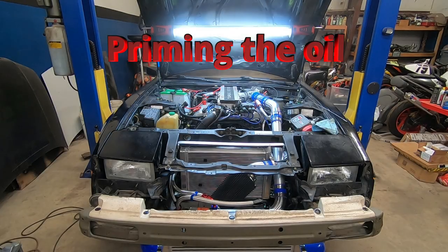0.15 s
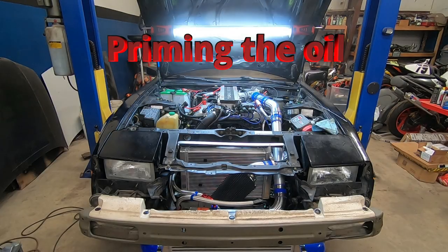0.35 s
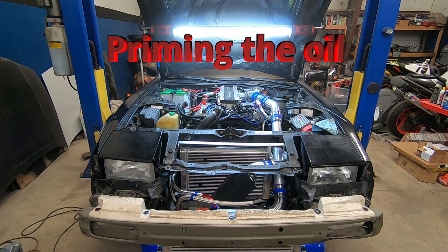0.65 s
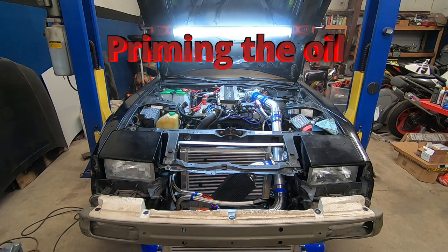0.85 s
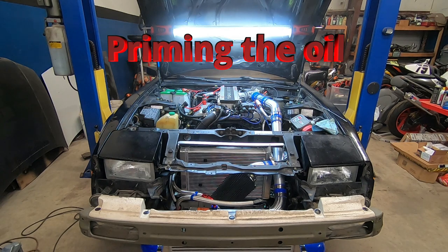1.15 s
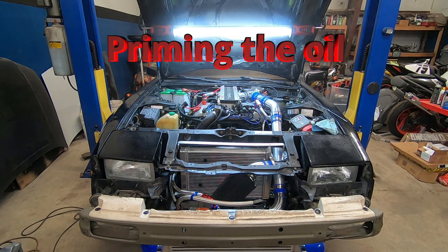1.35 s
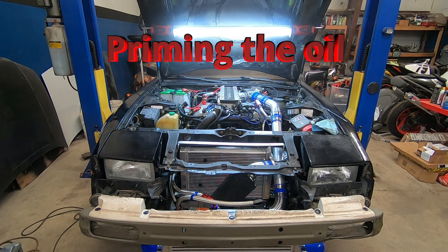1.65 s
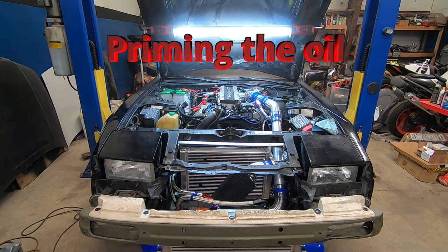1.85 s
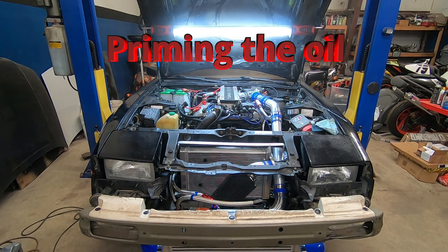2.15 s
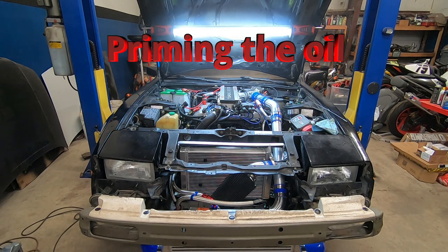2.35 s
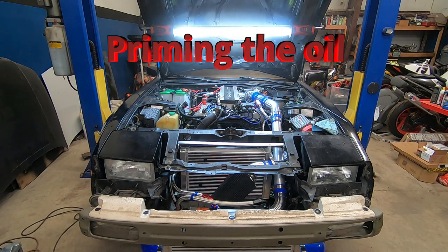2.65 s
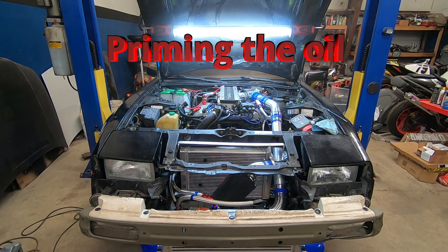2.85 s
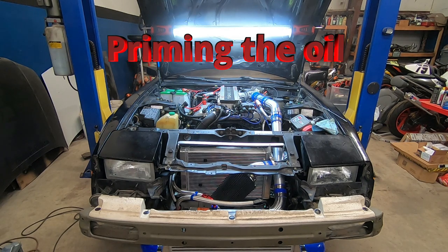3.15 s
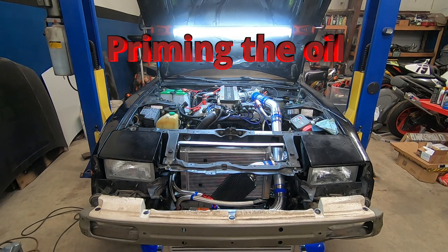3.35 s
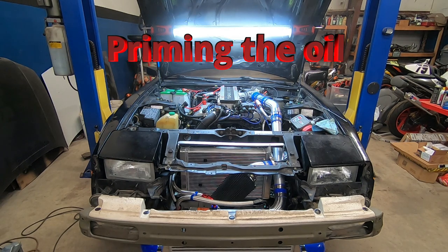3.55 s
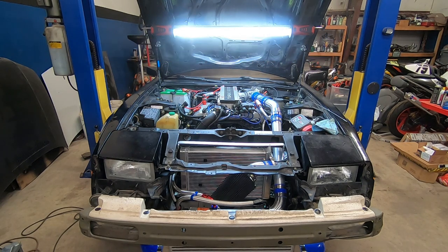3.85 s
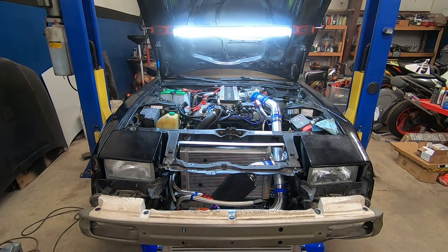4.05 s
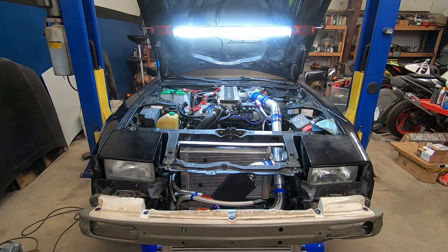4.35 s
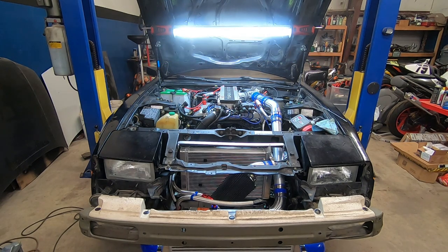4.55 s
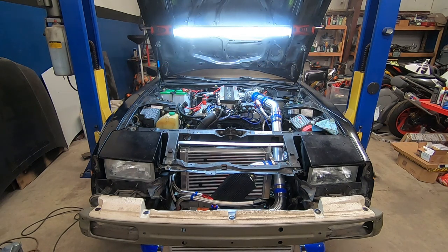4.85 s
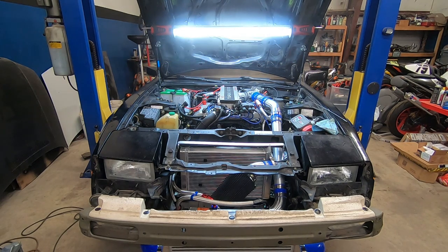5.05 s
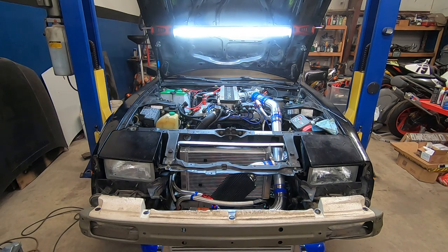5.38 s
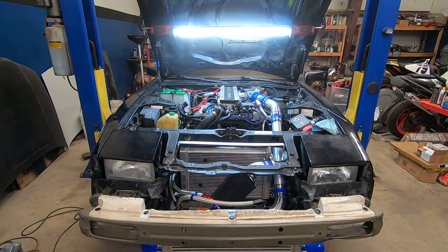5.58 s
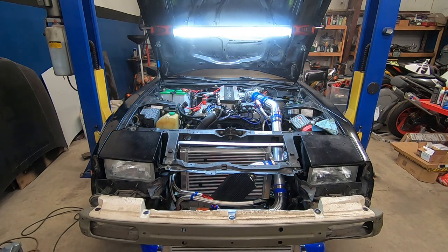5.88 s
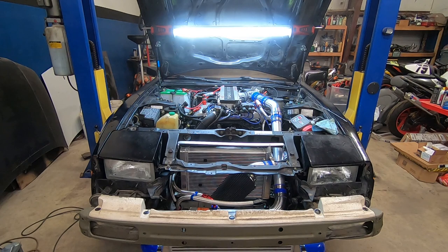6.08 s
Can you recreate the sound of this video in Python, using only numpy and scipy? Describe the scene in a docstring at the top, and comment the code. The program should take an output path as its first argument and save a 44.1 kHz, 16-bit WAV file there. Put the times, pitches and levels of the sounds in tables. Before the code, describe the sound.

Close in front of a car inside a hard-walled workshop, the starter cranks rapidly and evenly, its gears knocking, rebounding and grinding over soft low thumps. The engine never fires. A steel clank ends the effort, and the freed motor spins down with uneven rattles and low groans. Quiet room hum and a faint pump hiss remain until a tiny squeak; then a clunk, short squeals and laboured cranking cut off at the end.

```python
"""Starter cranking an engine in a garage

A car engine is turned on its starter twice without firing: impacts and rough contact excite resonant metal.
The starter grinds; each piston stroke shakes the gears into a group of knocks and thumps the air.
On release the pinion clanks free and the motor coasts; a pump hisses on and stops with a small squeak.
Steady hum, wavering drones and air noise fill the shop throughout."""
import sys
import numpy as np
from scipy import signal
from scipy.fft import rfft, irfft, next_fast_len
from scipy.io import wavfile
from scipy.ndimage import uniform_filter1d

SR = 44100
rng = np.random.default_rng(int(sys.argv[2]) if len(sys.argv) > 2 else 0)


def materialize(psi):
    """Save the field psi as 16-bit PCM at rate SR to the path in sys.argv[1].

    A 1-D psi becomes a single channel; in a 2-D psi each row is a channel.
    """
    bounded = np.clip(np.atleast_2d(psi).T, -1, 1)
    quanta = np.round(bounded * 32767).astype(np.int16)
    wavfile.write(sys.argv[1], SR, quanta)


N = 274302
SIZE = next_fast_len(N + SR)  # padded length for filtering
HZ, T = np.fft.rfftfreq(SIZE, 1 / SR), np.arange(N) / SR

# Levels are relative dB; each spectrum is scaled to unit power before use.
# Piston strokes, each a gear knock, its rebound and a settling. Each row: start in seconds, knock in dB,
# rebound delay in seconds, rebound in dB, settling delay in seconds, settling in dB.
STROKES = [(0.003, -16.5, 0.028, -23, 0.041, -36), (0.078, -20, 0.024, -20, 0.049, -23),
           (0.187, -18, 0.021, -23.5, 0.039, -24), (0.285, -19, 0.021, -18.5, 0.048, -20),
           (0.394, -22, 0.022, -18, 0.072, -36), (0.496, -17.5, 0.025, -19.5, 0.053, -20.5),
           (0.607, -17.5, 0.022, -19, 0.058, -27), (0.713, -19, 0.021, -17.5, 0.041, -25.5),
           (0.821, -17.5, 0.022, -19, 0.054, -38), (0.922, -18, 0.026, -17, 0.041, -28),
           (1.031, -21, 0.02, -19.5, 0.05, -26.5), (1.137, -17, 0.027, -19, 0.069, -30.5),
           (1.244, -17.5, 0.018, -18.5, 0.045, -21.5), (1.351, -19, 0.025, -18, 0.061, -26.5),
           (1.459, -20, 0.02, -21, 0.041, -21), (1.566, -16.5, 0.016, -21.5, 0.045, -23),
           (1.671, -19, 0.024, -18.5, 0.037, -29), (1.776, -19, 0.021, -16, 0.042, -27.5),
           (1.882, -17.5, 0.025, -17, 0.042, -25.5), (1.99, -18.5, 0.021, -19.5, 0.048, -21.5),
           (2.097, -19.5, 0.02, -20, 0.046, -25), (2.202, -17.5, 0.026, -18.5, 0.051, -26.5),
           (2.312, -18, 0.011, -23, 0.035, -33), (2.413, -21.5, 0.019, -20, 0.046, -21),
           (2.522, -18, 0.028, -19, 0.063, -29), (2.629, -18, 0.024, -20, 0.049, -22.5),
           (2.74, -17, 0.028, -22, 0.041, -34.5), (2.84, -19.5, 0.025, -20, 0.065, -21.5),
           (2.952, -21.5, 0.02, -18.5, 0.049, -24.5), (3.057, -19, 0.026, -19.5, 0.059, -25),
           (5.897, -20, 0.033, -26, 0.064, -23.5), (6.054, -21, 0.022, -21, 0.045, -25.5),
           (6.119, -23, 0.011, -29.5, 0.049, -28), (6.209, -20.5, 0.026, -20, 0.05, -25)]
# Bell housing and block modes. Each row: frequency in Hz, width in Hz, base gain over the broad sound in dB.
HOUSING = [(643, 25, 4), (743, 26, 7), (850, 35, 1), (1203, 18, 12.5), (1364, 40, 2), (1415, 16, 5),
           (1473, 20, 10.5), (1615, 20, 11), (1684, 14, 4), (1831, 30, 2), (2045, 20, 2), (2630, 24, 3),
           (2809, 22, 3), (3200, 120, 1), (3480, 150, 1)]
# Motor frame modes. Each row: frequency in Hz, width in Hz, gain over the broad sound in dB.
FRAME = [(4500, 180, 9), (5210, 160, 5), (6970, 1180, 4.5), (6360, 60, 8), (6430, 60, 5.5),
         (8490, 28, 10.5)]
# Starter under load, one table a try. Each row: time in seconds, base grind level in dB, rumble level in dB.
LOAD = [
    [(0.0, -23, -38.5), (3.14, -23.5, -39), (3.2, -26, -42.5), (3.26, -46.5, -56.5)],
    [(5.85, -30.5, -39), (5.862, -26.5, -36.5), (5.97, -22, -36), (6.04, -21.5, -43.5), (6.15, -23, -47),
     (6.22, -20.5, -35)],
]
# Spectrum of steel blows. Each row: frequency in Hz, density in dB per Hz.
STEEL = [(120, -41.5), (200, -7), (1030, -6.5), (1190, 4.5), (1840, -4), (2900, 1.5), (5900, -12),
         (6570, -10), (10000, -20.5), (12000, -41.5), (14200, -37), (15500, -54)]
ENGAGE_S, SPIN_UP_S = 5.86, .35  # second try: the motor starts to turn, time to reach speed
CLATTER_S = .008  # duration of the short clatter in a knock


def amp(db):
    """Decibels express amplitude ratios logarithmically."""
    return 10 ** (np.asarray(db) / 20)


def evened(x):
    """Normalisation to unit mean power."""
    return x / np.sqrt(np.mean(x ** 2) + 1e-20)


def read(points, hz):
    """Interpolation on a logarithmic frequency axis."""
    f, value = np.transpose(points)
    return np.interp(np.log(hz + 1), np.log(f + 1), value)


def level(rows, column=1):
    """Amplitude envelope: gain along a dB curve, silent outside it."""
    rows = np.array(rows)
    return amp(np.interp(T, rows[:, 0], rows[:, column], -200, -200))


def bursts(times, dbs, t60s, rise_s=0.0013, hold_s=0.):
    """Exponential decay: blows rise fast, hold and die away, cut after half a second; powers add."""
    power, t = np.zeros(N), np.arange(SR // 2) / SR
    for s, db, t60 in zip(times, dbs, t60s * np.ones(len(times))):
        decay_db = 60 * np.maximum(t - hold_s, 0) / max(t60, .01)
        blow = amp(db - decay_db) ** 2 * (1 - np.exp(-t / rise_s))
        part = power[round(s * SR):][:len(t)]
        part += blow[:len(part)]
    return np.sqrt(power)


def uneven(db, span_s):
    """Random amplitude modulation: smoothed noise makes the gain wander by an rms depth in dB."""
    wander = uniform_filter1d(rng.standard_normal(N), round(span_s * SR))
    return amp(db * evened(wander))


def colour(points, modes=()):
    """Modal response of unit power: a broad spectrum with resonances on top."""
    ring = 1 + sum(amp(db) / (1 + 2j * (HZ - hz) / width) for hz, width, db in modes)
    response = amp(read(points, HZ)) * ring
    return response / np.sqrt(np.mean(abs(response) ** 2))


def shaken(envelope, response, grain_db=0.):
    """Random excitation: dense taps under an envelope sound a body; one draw frontal, one sideways."""
    grain = amp(grain_db * rng.standard_normal(N // 32 + 1)).repeat(32)[:N]
    taps = rng.standard_normal((2, N)) * grain
    return irfft(rfft(evened(taps) * envelope, SIZE) * response, SIZE)[:, :N]


def tone(hz):
    """Phase accumulation: a unit-power sine with a random starting phase in each channel."""
    turns = np.cumsum(hz * np.ones(N)) / SR
    return np.sqrt(2) * np.sin(2 * np.pi * (turns + rng.random((2, 1))))


def getting_up_to_speed(t):
    """Linear spin-up: a share falling from one to zero as the motor gathers speed on the second try."""
    return (t > ENGAGE_S) * np.clip(1 - (t - ENGAGE_S) / SPIN_UP_S, 0, 1)


def knock_rows():
    """Repeated impact: strokes knock, rebound and settle; tone and cover rattle vary from knock to knock."""
    bright_db, bright_spread_db = -2, 2.5  # upper ring against lower
    cover_offset_db, cover_spread_db = -7, 3.5  # cover rattle against the knock
    slow_dull_db = -8  # knocks are dull until the motor is up to speed
    s, db, gap, rebound_db, settle_gap, settle_db = np.transpose(STROKES)
    luck = rng.standard_normal((len(s), 6)).T
    times = np.array([s, s + gap, s + settle_gap]).ravel()
    dbs = np.array([db, rebound_db, settle_db]).ravel()
    dull_db = slow_dull_db * getting_up_to_speed(times)
    upper_db = bright_db + bright_spread_db * luck[:3].ravel() + dull_db
    cover_db = dbs + cover_offset_db + cover_spread_db * luck[3:].ravel() + dull_db
    heard = times < N / SR
    return times[heard], dbs[heard], upper_db[heard], cover_db[heard]


def housing_ring(s, db):
    """Impulse response of modes: single blows inside each clatter ring the housing in varying mixes."""
    ring_db, rise_db_per_s = 20, 1.2  # gain of the clear ring, its growth through a try
    mode_spread_db = 3  # each blow favours other modes
    delay_s = 0.004003 + CLATTER_S * rng.random((len(s), 2)).T
    at = np.minimum(np.round((s + delay_s) * SR).astype(int), N - 1)
    out = np.zeros((2, N))
    for hz, width, mode_db in HOUSING:
        blows, keep = np.zeros((2, N)), np.exp(-np.pi * width / SR)
        luck_db = mode_spread_db * rng.standard_normal((len(s), 2)).T
        blow_db = db + rise_db_per_s * (s % ENGAGE_S) + 2 * mode_db + luck_db
        np.put_along_axis(blows, at, amp(blow_db), 1)
        pole = keep * np.exp(2j * np.pi * hz / SR)
        out += 2 * signal.lfilter([1 - keep], [1, -pole], blows).real
    blunt = 1 / (1 + 1j * HZ / 3500) ** 4  # steel on steel stays in touch a moment, which dulls the top
    return amp(ring_db) * irfft(rfft(out, SIZE) * blunt, SIZE)[:, :N]


def gear_knocks():
    """Impact excitation: slack gears strike the housing, some low, some high, and rattle a sheet cover."""
    # Each row: frequency in Hz, density in dB per Hz.
    knock_spectrum = [(400, -15.5), (502, -28), (738, -2.5), (1100, -1.5), (1200, -4.5), (1280, -1),
                      (1640, -0.5), (1910, -4.5), (3100, 0), (4010, -16.5), (5400, -14.5), (7190, -20),
                      (12000, -57.5), (15600, -74.5)]
    # Sheet cover modes. Each row: frequency in Hz, width in Hz, gain in dB before a common 30 dB boost.
    cover_modes = [(4414, 120, 0.5), (4974, 74, 10), (4790, 48, 9), (4820, 520, -5)]
    s, db, upper_db, cover_db = knock_rows()
    body, split = colour(knock_spectrum, HOUSING), 1 / (1 + (HZ / 2200) ** 6)
    low = bursts(s, db - upper_db / 2 - 1.5, 0.055, rise_s=0.005, hold_s=CLATTER_S)
    high = bursts(s, db + upper_db / 2, 0.045, rise_s=0.005, hold_s=CLATTER_S)
    knocks = shaken(low, body * np.sqrt(split), grain_db=1.5)
    knocks += shaken(high, body * np.sqrt(1 - split))
    boosted = [(hz, width, d + 30) for hz, width, d in cover_modes]
    cover = colour([(2000, -27.0), (4000, 4.5), (5500, 0), (9000, -45.0)], boosted)
    knocks += shaken(bursts(s, cover_db, 0.0555, rise_s=0.0069), cover, grain_db=1.5)
    return knocks + housing_ring(s, db), low + high


def grinding(knock_envelope):
    """Rough contact under load: teeth press harder after each knock and ease off before the next stroke."""
    # Each row: frequency in Hz, density in dB per Hz.
    grind_spectrum = [(280, -40), (400, -12.5), (511, -23.5), (737, -10.5), (927, 1.5), (1200, -2),
                      (1280, 3), (1630, 0), (1930, 3), (3250, -2.5), (4030, -9), (4410, -13.5), (7090, -19),
                      (10100, -25), (12500, -43.5), (15500, -42.5)]
    # Treble whirr, one table a try. Each row: time in seconds, level in dB before a common 1 dB cut.
    whirr_levels = [
        [(0.0, -37.5), (3.07, -38), (3.2, -33.5)],
        [(5.87, -51), (5.898, -38.5), (6.22, -38.5)],
    ]
    labour = 0.11  # steady strain, strongest as the motor starts to turn on the second try
    keep = np.exp(-1 / (0.036 * SR))
    strain = signal.lfilter([1 - keep], [1, -keep], knock_envelope)
    strain = strain + labour * getting_up_to_speed(T)
    load = sum(level(rows) for rows in LOAD)
    teeth = colour(grind_spectrum, FRAME + [(hz, width, d - 5) for hz, width, d in HOUSING])
    # power splits at 2600 and 5500 Hz; the strain acts mostly below the treble
    upper = 1 / (1 + (2600 / (HZ + 1)) ** 4)
    top = 1 / (1 + (5500 / (HZ + 1)) ** 12)
    grind = shaken((.3 + 5.5 * strain) * load, teeth * np.sqrt(1 - upper), grain_db=2.5)
    grind += shaken((0.59 + 1.1 * strain) * load, teeth * np.sqrt(upper * (1 - top)), grain_db=1.5)
    whirr = evened(abs(teeth) * np.sqrt(top))
    whirr_gain = sum(level(rows) for rows in whirr_levels) * amp(-1.0) * uneven(1.4, 0.032)
    return grind + shaken(whirr_gain, whirr, grain_db=1.5)


def slack_rattle():
    """Backlash: late in each stroke the slack gears rattle brightly against the motor frame."""
    slack_s, slack_db, spread_db = .078, -39, 6  # mean delay after the stroke, mean level, its spread
    strokes = np.array(STROKES)[:-1, 0]
    late, size = rng.standard_normal((len(strokes), 2)).T
    times = strokes + slack_s + 0.0056 * late
    slack = bursts(times, slack_db + spread_db * size, 0.066, rise_s=0.0037, hold_s=0.014)
    bright = colour([(3000, -29.5), (4400, 5.5), (7000, 0.5), (10000, -10.5), (14000, -27.5)], FRAME)
    return shaken(slack, bright, grain_db=3.5)


def starter():
    """Superposition: knocks, grinding teeth, slack gears and a low-frequency rumble add."""
    # Each row: frequency in Hz, density in dB per Hz.
    rumble_spectrum = [(15, -30.5), (28, -7), (60, -5), (90, -5), (110, -0.5), (160, -4.5), (240, -10.5),
                       (356, -8), (420, -6), (500, -13.5), (700, -7.5), (910, -33), (1100, -69.5)]
    knocks, knock_envelope = gear_knocks()
    rumble = shaken(sum(level(rows, column=2) for rows in LOAD), colour(rumble_spectrum))
    return knocks + grinding(knock_envelope) + slack_rattle() + rumble


def thumps():
    """Forced resonance: the pistons pump one puff of air a stroke into two low booms."""
    puffs_per_s, first_puff_s, puff_spread = 9.4, .075, 0.095
    boom_modes = [(47.0, 6), (75.2, 8.4)]  # Pipe and room. Each row: frequency in Hz, width in Hz.
    # One table a try. Each row: time in seconds, lower boom in dB, upper boom in dB.
    boom_levels = [
        [(0, -41.5, -43.5), (2.2, -47, -41), (3.22, -48, -43), (3.4, -58, -68)],
        [(5.86, -62, -54.5), (6.22, -60, -44)],
    ]
    # Six cylinders in turn. Each row: relative puff size, delay in seconds.
    cylinders = [(0.89, 0.0094), (0.8, .004), (0.84, 0.0056), (0.53, 0.0045), (1, 0), (0.78, 0.0037)]
    size, late = np.transpose(cylinders)
    k = np.arange(int(N / SR * puffs_per_s) - 1)
    turn = k % len(size)
    at = np.round((first_puff_s + k / puffs_per_s + late[turn]) * SR).astype(int)
    puffs = np.zeros((2, N))
    puffs[:, at] = size[turn] + puff_spread * rng.standard_normal((len(k), 2)).T
    out = np.zeros((2, N))
    for j, (hz, width) in enumerate(boom_modes):
        boom = irfft(rfft(puffs, SIZE) / (1 + 2j * (HZ - hz) / width) ** 2, SIZE)[:, :N]
        out += evened(boom) * sum(level(rows, column=j + 1) for rows in boom_levels)
    return out


def shop():
    """Sinusoids and narrow-band noise: steady hum, wavering drones and still air."""
    mains = [(119.5, -67.5), (175.5, -59), (240, -55.5), (360, -71.5), (479.6, -70.5), (599, -80.5),
             (720, -82.5)]  # Each row: frequency in Hz, level in dB.
    drones = [(48.3, 5.4, -71), (75.7, 6, -68), (149, 6.5, -64.5), (381.5, 5.3, -85)]  # Each row: frequency in Hz, width in Hz, level in dB.
    air_spectrum = [(15, -50), (30, -15), (100, -16), (220, -12), (300, -19.5), (400, -29), (600, -32.5),
                    (900, -29.5), (1150, -39), (7890, -55.5), (15000, -63)]  # Each row: frequency in Hz, density in dB per Hz.
    out = sum(amp(db) * tone(hz) for hz, db in mains)
    white = rfft(rng.standard_normal((2, SIZE)))
    for hz, width, db in drones:
        drone = irfft(white / (1 + 2j * (HZ - hz) / width) ** 2, SIZE)[:, :N]
        out = out + amp(db) * evened(drone)
    return out + shaken(amp(-61.5), colour(air_spectrum))


def clanks():
    """Steel impact: solenoid and pinion strike bright blows; the flywheel keeps a thin modal ring."""
    # Solenoid and pinion blows. Each row: start in seconds, level in dB, time to fall 60 dB in seconds.
    blow_rows = [(3.1476, -18, 0.26), (5.8376, -49, 0.2), (5.8545, -23.5, 0.12), (5.8656, -17.5, 0.11)]
    # Flywheel modes. Each row: frequency in Hz, width in Hz, gain over the broad sound in dB.
    flywheel = [(6250, 60, 30), (6400, 60, 32), (6760, 80, 28)]
    # The solenoid pulls, then the pinion seats: times in seconds and levels in dB.
    thud_s, thud_db = [5.839, 5.878], [-39, -19.5]
    thud_spectrum = [(120, -17), (220, 0), (350, 0), (520, -0.5), (900, -44)]  # Each row: frequency in Hz, density in dB per Hz.
    s, db, t60 = np.transpose(blow_rows)
    blows = shaken(bursts(s, db, t60, rise_s=0.0031, hold_s=0.0046), colour(STEEL), grain_db=1.5)
    thin = colour([(4000, -28.5), (6000, -3.0), (7000, 6.0), (10000, -30.5)], flywheel)
    ring = shaken(bursts(s[:1], [-32], 0.63), thin)  # after the release only
    thud = shaken(bursts(thud_s, thud_db, 0.1, rise_s=0.0061), colour(thud_spectrum))
    return blows + thud + ring


def coasting():
    """Free run-down: the unloaded motor whirs unevenly, its pinion rattles and its casing groans."""
    run_down = [(3.2, -36.5), (3.358, -40.5), (3.8, -47), (4.24, -50), (4.34, -59), (4.5, -84.5)]  # Each row: time in seconds, whir level in dB.
    whir_spectrum = [(240, -14.5), (400, -4.5), (665, -10), (830, -9), (1090, -8), (1330, -6), (1990, -2),
                     (3810, -11), (4450, -17.5), (5490, -22), (6500, -25), (9000, -46), (11700, -59.5),
                     (19800, -120)]  # Each row: frequency in Hz, density in dB per Hz.
    # Starter casing modes. Each row: frequency in Hz, width in Hz, base gain over the broad sound in dB.
    casing = [(830, 60, 5), (915, 60, 8), (1380, 180, 3), (1830, 26, 4), (1960, 78, 0), (3000, 60, 3),
              (3220, 50, 2), (3460, 50, 3), (4470, 240, 3), (6345, 18, 19)]
    rattles = [(3.4896, -42.5), (3.55, -37), (3.5737, -46), (3.6401, -49), (3.655, -38), (3.751, -35.5),
               (3.804, -33), (3.8456, -31), (4.076, -40), (4.126, -38.5), (4.2747, -44.5)]  # Loose pinion. Each row: start in seconds, level in dB.
    # The casing groans in lumps as the shaft slows. Each row: start in seconds, level in dB.
    groans = [(3.552, -50), (3.641, -47), (3.9, -48), (3.93, -50), (3.99, -47), (4.041, -46),
              (4.075, -49.5), (4.118, -46.5), (4.183, -48.5), (4.225, -49.5), (4.274, -52)]
    whir = shaken(level(run_down) * uneven(1.6, 0.03), colour(whir_spectrum, casing), grain_db=2.0)
    s, db = np.transpose(rattles)
    band = 1 / (1 + (HZ / 5200) ** 6) / (1 + (1600 / (HZ + 1)) ** 4)
    rattle = shaken(bursts(s, db, 0.081, rise_s=0.0067), colour(STEEL, casing) * band, grain_db=0.5)
    s, db = np.transpose(groans)
    low_modes = [(hz, width, d + 14) for hz, width, d in casing[:2]]
    low = colour([(500, -22), (870, 1), (1400, -22.5), (3000, -61)], low_modes)
    groan = shaken(bursts(s, db, .09, rise_s=.006, hold_s=0.017), low)
    return whir + rattle + groan


def pump():
    """Flow noise and harmonic tones: a hiss and a motor note end on a bright squeak and a duller one."""
    hiss_levels = [(3.2, -37.5), (3.386, -59.5), (4.492, -71.5), (5.104, -69.5), (5.11, -69)]  # Each row: time in seconds, hiss level in dB.
    hiss_spectrum = [(1180, -48), (2000, -19), (3480, -7), (4200, 2.5), (4660, -2.5), (5760, 4),
                     (6300, 2.5), (7360, -3), (7790, 2.5), (14000, -21)]  # Each row: frequency in Hz, density in dB per Hz.
    # Pump body modes. Each row: frequency in Hz, width in Hz, gain over the broad sound in dB.
    body_modes = [(4900, 80, -1.5), (6710, 135, 0), (7160, 49, 10.5)]
    # The pump stops and rocks back. Each row: start in seconds, time to fall 60 dB in seconds,
    # rise in seconds, hold in seconds, hiss level in dB.
    stops = [(5.113, 0.05, .005, .012, -53), (5.137, 0.1, .008, .034, -66)]
    # Squeak partials from the fundamental up. Each row: level in dB as it stops, level in dB as it rocks back.
    partials = [(-56, -58), (-64, -58), (-72, -80), (-53, -82), (-72, -84), (-61, -82), (-54, -78),
                (-62, -76), (-59, -74), (-63, -78), (-67, -80)]
    stop_spectrum = [(300, -32), (800, -3.5), (3000, -7), (5500, 3.5), (8000, -2), (11000, -17),
                     (15000, -20)]  # Each row: frequency in Hz, density in dB per Hz.
    squeak_hz, flutter, waver_db = 903, .007, 2.5  # mean pitch, rms pitch share, rms wobble in dB of each partial's level
    wander = evened(uniform_filter1d(rng.standard_normal(N), 300))
    pitch = squeak_hz * (1 + flutter * wander)
    out = shaken(level(hiss_levels), colour(hiss_spectrum, body_modes))
    out += amp(-67.5) * tone(317) * (T < stops[0][0])  # motor note in Hz, present from the outset
    for k, (s, t60, rise_s, hold_s, hiss_db) in enumerate(stops):
        push = bursts([s], [0], t60, rise_s=rise_s, hold_s=hold_s)
        for n, row in enumerate(partials):
            out += push * amp(row[k]) * uneven(waver_db, 0.0064) * tone((n + 1) * pitch)
        out += shaken(amp(hiss_db) * push, colour(stop_spectrum))
    return out


def squeals():
    """Frictional slip: teeth under load give short unsteady tones as the motor labours up to speed."""
    # Each row: start in seconds, length in seconds, first pitch in Hz, last pitch in Hz, base level in dB.
    glides = [(5.92, 0.038, 768, 790, -28.5), (5.946, 0.12, 4810, 4640, -34.5),
              (6.02, 0.076, 825, 850, -25), (6.06, 0.063, 2534, 2500, -25.5),
              (6.03, 0.081, 4860, 4840, -33), (6.087, 0.024, 3680, 3580, -26),
              (6.054, 0.1, 1247, 1214, -26)]
    out = 0
    for s, length, from_hz, to_hz, db in glides:
        u = np.clip((T - s) / length, 0, 1)
        flutter = 1 + 0.02526 * evened(uniform_filter1d(rng.standard_normal(N), 150))
        pitch = (from_hz + (to_hz - from_hz) * u) * flutter
        out = out + amp(db) * np.sin(np.pi * u) * tone(pitch)
    return out


def garage(x):
    """Reverberation: scattered echoes of random sign, each band dying at its own speed."""
    decay_times = [(100, 0.67), (1000, 0.6), (4000, 0.55), (12000, 0.3)]  # Each row: frequency in Hz, time to fall 60 dB in seconds.
    taps = np.zeros((2, SR))
    at = np.arange(200, SR - 20, 20) + rng.integers(0, 20, (2, (SR - 201) // 20))
    np.put_along_axis(taps, at, rng.choice([-1., 1.], at.shape), 1)
    hz, t, z = signal.stft(taps, SR, nperseg=256)
    decay = amp(-60 * t / read(decay_times, hz)[:, None])
    tail = signal.istft(z * decay, SR, nperseg=256)[1]
    return signal.fftconvolve(x, tail / np.linalg.norm(tail[0]), axes=1)[:, :N]


def scene():
    """Sum and difference stereo: frontal and sideways sound meet at the left and right ports."""
    # Each row: frequency in Hz, sideways against frontal pickup in dB.
    width_curve = [(60, -17.5), (120, -20.5), (240, -16), (480, -15.5), (950, -3.5), (1890, -3.5),
                   (3770, -11), (7520, 0), (15000, 0.5)]
    # Each row: frequency in Hz, share of the sideways sound that is frontal sound a quarter turn ahead.
    ahead_curve = [(200, -.2), (500, .15), (870, .5), (1250, .4), (1500, 0)]
    car = starter() + squeals() + clanks() + coasting() + pump()
    front, side = rfft(car + amp(-9.0) * garage(car) + thumps() + shop(), SIZE)
    ahead = np.clip(read(ahead_curve, HZ), -1, 1)
    side = np.sqrt(1 - ahead ** 2) * side + 1j * ahead * front
    side = side * amp(read(width_curve, HZ))
    return irfft(np.array([front + side, front - side]), SIZE)[:, :N]


def record(dry):
    """Channel balance, soft saturation and band limiting: the ports lean apart and peaks round off."""
    lean_curve = [(60, -2.7), (150, 0.5), (380, -2.6), (950, -1), (2380, -0.5), (5980, -0.5), (7750, -4.5),
                  (10300, 2.5), (15000, 2)]  # Each row: frequency in Hz, left over right in dB.
    lean = amp(read(lean_curve, HZ) / 2)
    ports = irfft(rfft(dry, SIZE) * np.array([lean, 1 / lean]), SIZE)[:, :N]
    ports = .55 * np.tanh(ports / .55)  # the preamplifier rounds off the peaks
    edge = np.clip((15650 - HZ) / 200, 0, 1) ** 2  # nothing passes above this edge
    return irfft(rfft(ports, SIZE) * edge, SIZE)[:, :N]


dry = scene()
out = record(dry)
materialize(out)
```